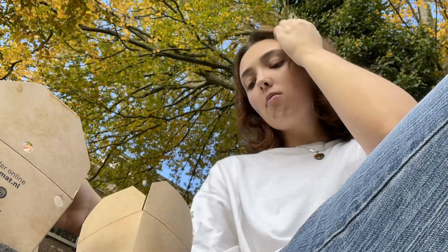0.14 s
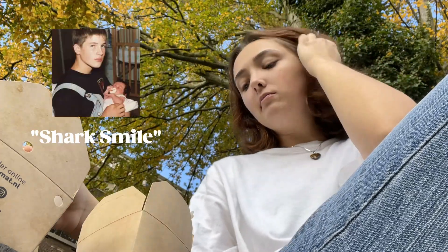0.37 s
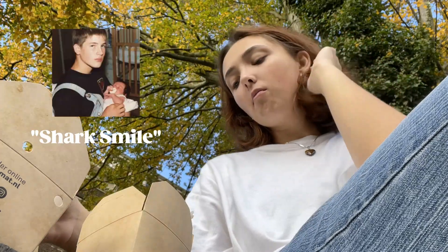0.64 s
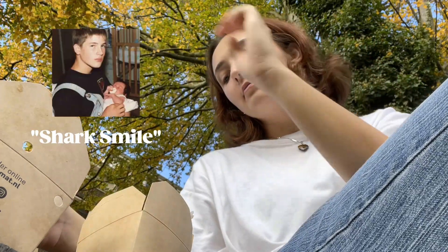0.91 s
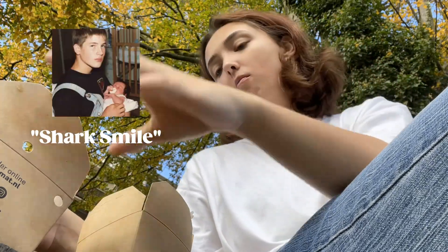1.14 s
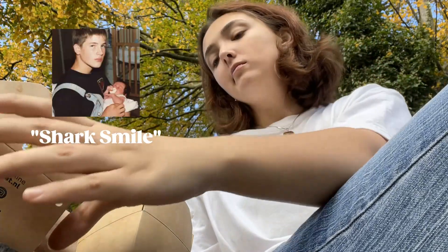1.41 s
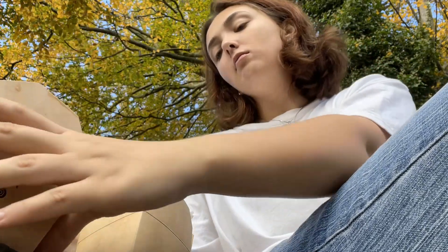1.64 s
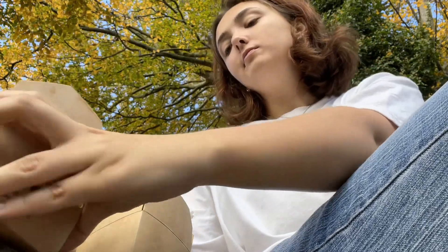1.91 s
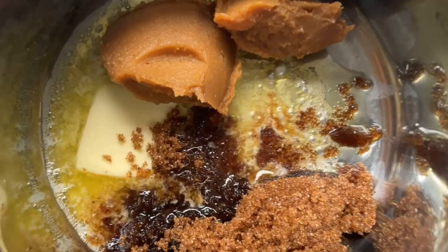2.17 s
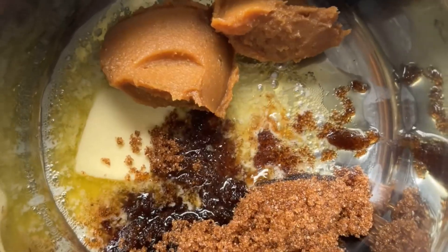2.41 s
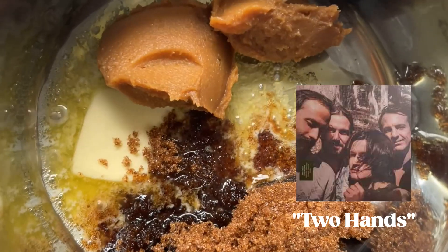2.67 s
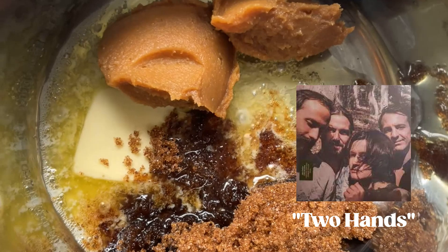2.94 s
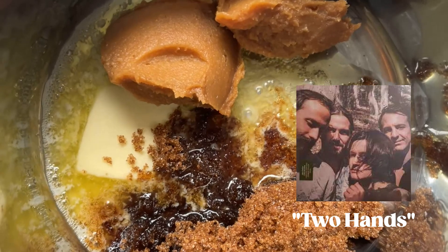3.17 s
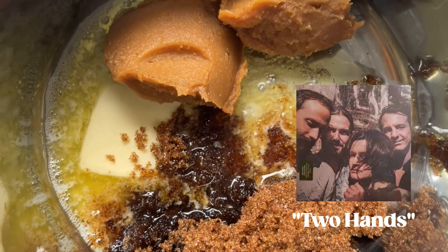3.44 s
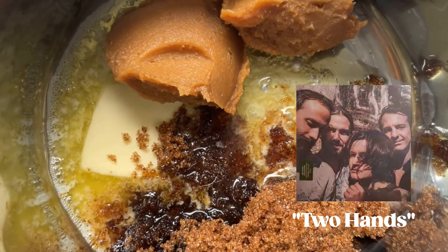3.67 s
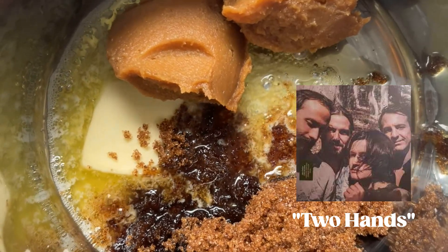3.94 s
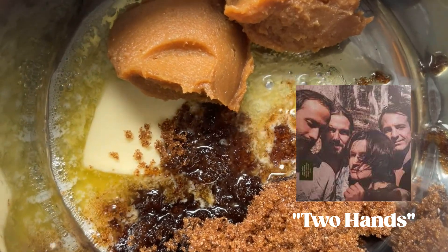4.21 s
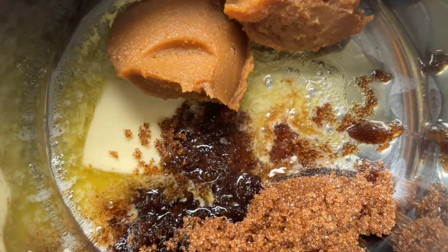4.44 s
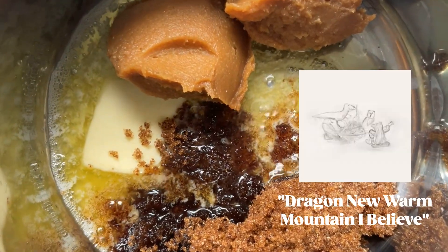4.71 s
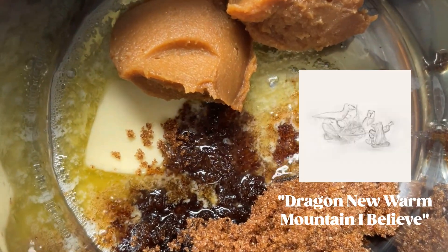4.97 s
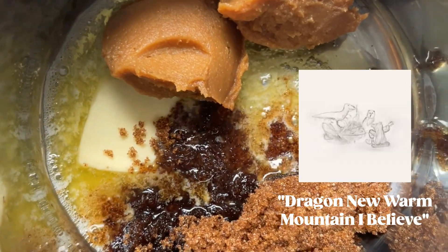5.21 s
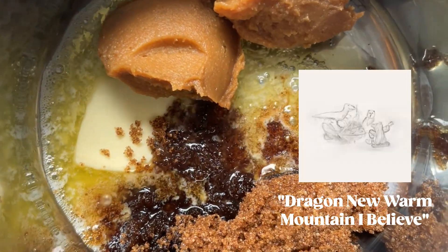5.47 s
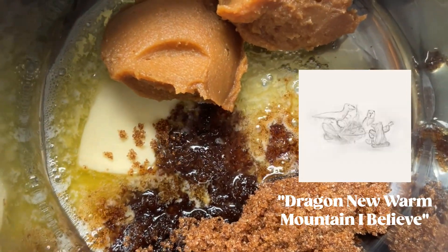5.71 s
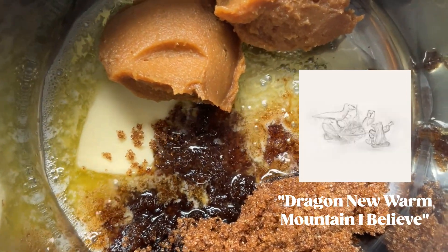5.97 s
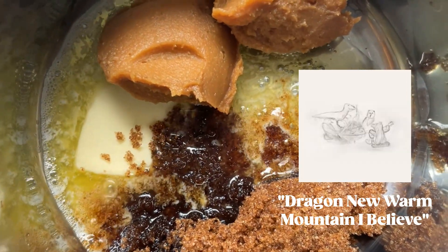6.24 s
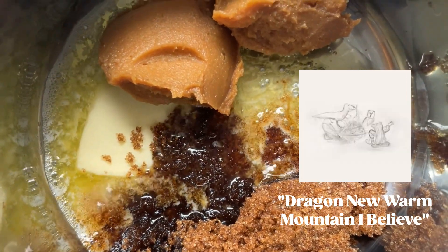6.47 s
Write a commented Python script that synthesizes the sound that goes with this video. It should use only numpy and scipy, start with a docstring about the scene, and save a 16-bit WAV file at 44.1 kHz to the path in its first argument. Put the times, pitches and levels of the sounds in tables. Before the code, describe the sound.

A quiet park: steady low rumble of distant traffic, faint engine hums, barely audible leaves and tiny high blips. Near two seconds a hand rubs a cardboard box close to the microphone, with hollow scuffs and small creaks. A sharp cut and a tiny silence, then butter and sugar sizzle in a metal pan heard closely from above, with snappy pops, sputters and a slight metallic ring, until it stops dead.

```python
"""A park under trees: distant traffic rumble, far engines, leaves and short high blips, all shaped from noise.
A hand rubs a cardboard box beside the microphone: uneven grains of noise excite the card's resonances.
After a short silence, butter and sugar sizzle in a steel pan heard from close above: steam pockets burst
through the fat as pops and short rising sputters, and the bowl of the pan rings. Each is a snap and a
spiky jet of noise through resonances; fizz, spray and gurgle fill in below. It stops dead."""
import sys
import numpy as np
from scipy import signal
from scipy.fft import rfft, irfft, next_fast_len
from scipy.io import wavfile
from scipy.ndimage import uniform_filter1d

SR = 44100
rng = np.random.default_rng(int(sys.argv[2]) if len(sys.argv) > 2 else 0)


def undo_db(level):
    """Turn decibels back into plain size, where 20 dB means ten times bigger."""
    steps = np.asarray(level, float) / 20
    return 10 ** steps


def pcm_store(signal):
    """Save signal as 16-bit PCM."""
    levels = np.round(np.clip(np.atleast_2d(signal), -1, 1) * 32767)
    wavfile.write(sys.argv[1], SR, levels.astype(np.int16).T)


N = 291485  # length in samples


def evened(x):
    """Scales to rms 1."""
    return x / np.sqrt(np.mean(x ** 2) + 1e-20)


def hiss():
    """White noise for the whole length."""
    return rng.standard_normal(N)


def curve(rows, column=1):
    """Draws one column of a table as an automation line, a value for every sample."""
    rows = np.array(rows)
    return np.interp(np.arange(N) / SR, rows[:, 0], rows[:, column])


def swells(rows, rest_db):
    """Bell-shaped rises of level over a resting level, as gain; their powers add."""
    t = np.arange(N) / SR
    bells = sum(undo_db(db) ** 2 * np.exp(-((t - s) / half) ** 2) for s, half, db in rows)
    return np.sqrt(undo_db(rest_db) ** 2 + bells)


def add(mix, s, sound):
    """Mixes a sound in at time s."""
    part = mix[round(s * SR):][:len(sound)]
    part += sound[:len(part)]


def resonate(x, hz, width_hz):
    """Resonance of gain 1: shifts hz (fixed or gliding) down to zero, smooths, and shifts back."""
    turn = np.exp(2j * np.pi * np.cumsum(hz * np.ones(len(x))) / SR)
    r = np.exp(-np.pi * width_hz / SR)
    return 2 * (turn * signal.lfilter([1 - r], [1, -r], x / turn)).real


def wash(spectrum, patchy_db, flicker_db):
    """Noise of a given spectrum with drifting patches and a flicker common to all pitches, at rms 1."""
    frames, hz = N // 256 + 5, np.fft.rfftfreq(1024, 1 / SR)
    a, b, patches = rng.standard_normal((frames, 513, 3)).T
    patches = evened(uniform_filter1d(uniform_filter1d(patches, 14, 0), 12, 1))
    flicker = evened(uniform_filter1d(rng.standard_normal(frames), 4))
    f, db = np.transpose(spectrum)
    shape_db = np.interp(np.log(hz + 1), np.log(f + 1), db)[:, None]
    field_db = shape_db + patchy_db * patches + flicker_db * flicker
    noise = signal.istft((a + 1j * b) * undo_db(field_db), nperseg=1024, noverlap=768)[1]
    return evened(noise[:N])


def crackle(x, spread_db, size=60):
    """Breaks steady noise into short grains of about size samples, at rms 1."""
    grains = uniform_filter1d(rng.exponential(1, N) ** 2, size)
    return evened(x * undo_db(spread_db * evened(grains - 2)))


# Colour of the traffic: f/Hz, relative density/dB per Hz
TRAFFIC_SPECTRUM = [(20, -33), (58, 1.5), (100, 1), (170, -3), (416, -12.5), (650, -19.5), (900, -15.5),
                    (1250, -21), (1700, -28.5), (3500, -35.5), (8200, -50), (12800, -52), (16500, -73)]
# Fader of the traffic: t/s, level/dB
TRAFFIC_LEVEL = [(0.0, -42), (0.07, -40), (2.05, -44)]


def traffic():
    """Distant traffic: many far sources blur into one nearly steady low wash."""
    return undo_db(curve(TRAFFIC_LEVEL)) * wash(TRAFFIC_SPECTRUM, patchy_db=1.25, flicker_db=-0.14)


# Colour of the rustle in the crowns: f/Hz, relative density/dB per Hz
LEAVES_SPECTRUM = [(5000, -30), (8500, -8), (11000, 5), (13500, -4), (16000, -28)]
LEAVES_DB = -83.5


def leaves():
    """Leaves brush each other: faint, restless, patchy treble."""
    return undo_db(LEAVES_DB) * wash(LEAVES_SPECTRUM, patchy_db=5.5, flicker_db=5.5)


# Far engines: f/Hz, width/Hz, fader [t/s, level/dB]
ENGINE_DRONES = [(101, 18, [(0, -64), (1.0, -52), (2.05, -47.5)]), (157, 22, [(0, -48), (.6, -54.5),
                 (1.1, -56), (2.05, -71)])]
# One more engine swelling: middle t/s, half width/s, level/dB
ENGINE_MOANS = [(.38, 0.067, -50.5)]
MOAN_HZ = 354


def engines():
    """Far engines: noise narrowed by a resonance to a wavering hum."""
    out = swells(ENGINE_MOANS, -np.inf) * evened(resonate(hiss(), MOAN_HZ, 40))
    for hz, width, levels in ENGINE_DRONES:
        out += undo_db(curve(levels)) * evened(resonate(hiss(), hz, width))
    return out


# Faint steady bands in the distance: f/Hz, level/dB
DISTANT_BANDS = [(3650, -73), (4480, -78)]


def distant_bands():
    """Narrow bands of noise that hold one level."""
    return sum(undo_db(db) * evened(resonate(hiss(), hz, 130)) for hz, db in DISTANT_BANDS)


# Faint short narrow bands of high noise, some gliding: t/s, length/s, first f/Hz, last f/Hz, level/dB
BLIPS = [(0.146, 0.11, 10600, 10500, -72), (.12, .12, 9200, 9050, -73), (.22, .06, 12900, 12800, -72),
         (0.347, .05, 9650, 9500, -80), (.43, .04, 13200, 13100, -75), (.49, .04, 14400, 14300, -73),
         (.585, .03, 10000, 10100, -76), (0.64, 0.042, 10130, 10430, -70), (.885, 0.066, 11900, 11750, -72),
         (.92, .03, 9200, 9150, -72), (1.07, .05, 8860, 8850, -73), (1.21, 0.069, 9350, 9450, -73),
         (1.368, .06, 10650, 10550, -71), (1.44, .03, 10500, 10300, -74), (1.473, 0.066, 12050, 13450, -66)]


def blips():
    """Each blip is noise through a narrow, often gliding resonance, faded in and out."""
    out = np.zeros(N)
    for s, length, first_hz, last_hz, db in BLIPS:
        glide = np.linspace(first_hz, last_hz, round(length * SR))
        band = resonate(rng.standard_normal(len(glide)), glide, 46.4)
        add(out, s, undo_db(db) * evened(band) * np.hanning(len(glide)))
    return out


# Resonances of the cardboard: f/Hz, width/Hz, relative level/dB
BOX_MODES = [(523, 230, 10.5), (1010, 100, 19), (1940, 82, -9), (4400, 1600, -24), (7400, 2000, -21)]
# The grip flexes the card: t/s, pitch factor
CARD_FLEX = [(1.74, .95), (1.855, 0.86), (1.89, 1.05), (1.99, 0.98), (2.05, 1.1)]
# Strokes of the hand: middle t/s, half width/s, level/dB
RUB_STROKES = [(1.76, 0.0092, -48.5), (1.86, 0.04, -46), (1.965, 0.027, -43), (2.02, 0.026, -51.5)]


def rubbed_box():
    """Skin slips unevenly on the card, and the slips set its bending resonances going."""
    slips = hiss() * undo_db(1.1 * rng.exponential(1, N))
    slips = crackle(slips, spread_db=1.8, size=150)
    flex = curve(CARD_FLEX)
    box = sum(undo_db(db) * resonate(slips, hz * flex, width) for hz, width, db in BOX_MODES)
    box = resonate(box, 2100, 14000)  # softens the treble
    return swells(RUB_STROKES, -np.inf) * evened(box)


# Creaks of the box: t/s, level/dB, f/Hz
BOX_CREAKS = [(1.8088, -59, 6480), (1.819, -53.5, 3470), (1.8304, -56, 3490), (1.845, -57.5, 6810),
              (1.861, -58, 4450), (1.961, -53.5, 4900)]


def creaks():
    """The card snaps: a dying tick of noise through a broad resonance."""
    out = np.zeros(N)
    for s, db, hz in BOX_CREAKS:
        snap = rng.standard_normal(400) * np.exp(-np.arange(400) / SR / 0.009)
        add(out, s, undo_db(db) * evened(resonate(resonate(snap, hz, 2.0 * hz), hz, 8000)))
    return out


def park():
    """The park bed, with the box close in front."""
    return traffic() + leaves() + engines() + distant_bands() + blips() + rubbed_box() + creaks()


# Colour of the low rumble indoors: f/Hz, relative density/dB per Hz
ROOM_SPECTRUM = [(25, -35), (50, -1.5), (85, 10), (130, -11), (200, -29), (500, -52)]
# The rumble swelling: middle t/s, half width/s, level/dB
ROOM_BUMPS = [(2.13, .05, -75), (2.3, .09, -71), (2.52, .06, -67.5), (2.9, 0.043, -71), (3.6, 0.11, -78),
              (4.05, 0.042, -64), (4.3, .06, -79), (4.85, 0.19, -77.5), (5.4, 0.22, -72.5),
              (5.77, 0.044, -66.5), (6.45, 0.083, -66.5)]
ROOM_DB = -77  # at rest


def room():
    """Low rumble indoors: a bass-heavy wash that swells now and then."""
    return swells(ROOM_BUMPS, ROOM_DB) * wash(ROOM_SPECTRUM, patchy_db=1.1, flicker_db=-2.2)


# Colour of thick melt stirring: f/Hz, relative density/dB per Hz
GURGLE_SPECTRUM = [(100, -43), (180, 0.5), (550, -3), (800, -26)]
GURGLE_DB = -75  # at rest
STIR_DB, STIR_S = -24.5, 0.034  # against the ring of a 5 ms burst; half width of a heave


def gurgle():
    """Every burst that rings the bowl sets the thick melt heaving for a moment, longer bursts more."""
    heaves = [(s, STIR_S, bowl_db + STIR_DB + 10 * np.log10(ms / 5)) for s, _, _, ms, bowl_db in POPS]
    melt = wash(GURGLE_SPECTRUM, patchy_db=1.5, flicker_db=2.5)
    return swells(heaves, GURGLE_DB) * crackle(melt, spread_db=3.0)


# Colour of the simmer: f/Hz, relative density/dB per Hz
SIMMER_SPECTRUM = [(330, -51.5), (560, -3.5), (832, 5), (1570, -3.5), (6670, -3.5), (9600, -12.5),
                   (11500, -20), (15200, -22), (16500, -24)]
# Heat of the fat, to which each layer adds an offset: t/s, fizzing level/dB, bubbling level/dB
HEAT_CURVE = [(2.1, -51.5, -58.5), (2.25, -53.5, -53), (2.41, -57, -60), (2.52, -51.5, -62),
              (2.9, -52, -59), (3.2, -58, -57.5), (3.5, -53, -57), (3.9, -56, -55), (4.1, -55, -59),
              (4.4, -55, -55.5), (4.65, -54, -47.5), (4.9, -55, -51), (5.2, -56, -52.5), (5.5, -52, -53),
              (5.95, -52.5, -56), (6.2, -53, -50), (6.38, -47, -52.5), (6.53, -48.5, -58)]


def simmer():
    """Countless tiny bubbles merge into a grainy wash that follows the fizzing."""
    grains = crackle(wash(SIMMER_SPECTRUM, patchy_db=2.7, flicker_db=1.6), spread_db=0.5)
    return undo_db(curve(HEAT_CURVE) - 4.0) * grains


BOWL_HZ, BOWL_WIDTH_HZ = 833.4, 174  # main ring of the bowl, before small detunings
SEETHE_DB = -8.5  # against the bubbling level


def seethe():
    """The bubbling keeps the bowl ringing steadily: crackling noise through its resonance."""
    ring = resonate(resonate(hiss(), 1.012 * BOWL_HZ, BOWL_WIDTH_HZ), 1.105 * BOWL_HZ, 400)
    return undo_db(curve(HEAT_CURVE, column=2) + SEETHE_DB) * crackle(ring, spread_db=3.5, size=120)


# Finest mist swelling: middle t/s, half width/s, level/dB
SPRAY_SWELLS = [(2.14, 0.14, -50.5), (2.7, .15, -57), (3.05, 0.074, -65), (4.3, 0.071, -53),
                (4.85, .3, -69), (5.85, 0.1, -63), (6.15, .02, -60), (6.32, 0.056, -60.5), (6.48, .04, -63)]
SPRAY_DB = -66  # at rest


def spray():
    """The finest mist: top treble broken into very short grains and again into longer ones."""
    air = resonate(resonate(hiss(), 14000, 5000), 15000, 7000)
    air = crackle(crackle(air, spread_db=3.0, size=25), spread_db=2.5, size=900)
    return swells(SPRAY_SWELLS, SPRAY_DB) * air


MIST_DB, MIST_S = -18, 0.033  # against the burst; time constant of the fade


def mist():
    """Droplets thrown up by each large burst hiss on as they fall back."""
    thrown = np.zeros(N)
    for s, db, _, ms, _ in POPS:
        add(thrown, s, [undo_db(db + MIST_DB) ** 2 * ms / (1 + ms)])
    power = signal.lfilter([1], [1, -np.exp(-2 / (MIST_S * SR))], thrown)
    drops = resonate(resonate(hiss(), 6200, 9500), 8500, 9000)
    return np.sqrt(power) * crackle(drops, spread_db=5.5, size=40)


def chances(count, size):
    """Noise and spike sizes for each burst."""
    return np.stack([rng.standard_normal((count, size)), rng.exponential(1, (count, size))], 1)


TAIL_MS = 1.5  # a vent closes softly
SWELL_PER_MS = 0.006  # long vents build up over a share of their length


def burst(hz, octaves, ms, chance):
    """A vent opens with a snap, then sputters; its pitch climbs as the pocket empties. The bowl rings along."""
    size = np.clip(round(ms * SR / 1000), 8, chance.shape[1] - 400)
    t = np.arange(size + 400) / size  # in lengths of the vent
    noise, spikes = chance[:, :len(t)]
    blowing = np.exp(-(1.1 + 2.0 / ms) * t - np.maximum(t - 1, 0) * ms / TAIL_MS)
    blowing *= min(ms / 7.3, 1)  # short vents are mostly snap
    blowing *= 1 - np.exp(-t / (SWELL_PER_MS * ms))
    sputter = np.minimum(np.repeat(spikes, repeats=24)[:len(t)], 3)  # steam leaves in clumps
    jet = noise * undo_db(2.2 * spikes + 4.7 * sputter) * blowing
    thuds = noise * undo_db(6.0 * spikes) * blowing
    jet[0] += 3.9 * np.sign(noise[0])
    thuds[0] += 45 * np.sign(noise[0])  # the bowl answers mostly to the opening and the hardest spits
    climb = np.minimum(hz * 2 ** (0.011 * ms * (np.minimum(t, 1) - .5)), SR / 2.5)
    width_hz = np.clip(0.96 * octaves * hz, 300, 9000)
    vent = jet
    for factor in (1, 1.17, 1.93, 2.9):
        vent = resonate(vent, climb, factor * width_hz)
    detuned_hz = BOWL_HZ * 2 ** (0.09 * abs(noise[1]))
    ring = resonate(resonate(thuds, detuned_hz, BOWL_WIDTH_HZ), 1010, 970)
    slap = resonate(resonate(thuds, 2300, 2500), 2300, 3500)  # comes before the ring
    bowl = evened(ring) + 0.21 * evened(slap)
    return np.array([evened(vent), evened(bowl)]) * np.sqrt(size / len(t))


FIZZ_PER_S, FIZZ_KINDS = 1100, 300


def fizz():
    """A crowd of tiny pockets of many kinds, mostly short ticks, whose strength follows the heat."""
    kinds = []
    for (pitch, broad, long), chance in zip(rng.random((FIZZ_KINDS, 3)), chances(FIZZ_KINDS, size=800)):
        hz, octaves = 2200 * 2 ** (2.6 * pitch ** 1.6), 0.22 + .45 * broad ** 3
        kinds.append(burst(hz, octaves, 0.21 + 2.37 * long ** 3, chance))
    out, fizz_db, bowl_db = np.zeros(N), curve(HEAT_CURVE), curve(HEAT_CURVE, column=2)
    start, end = KITCHEN_SPAN
    for when, kind, big, low in rng.random((round(FIZZ_PER_S * (end - start)), 4)):
        s = start + when * (end - start)
        vent_db = fizz_db[round(s * SR)] - 8.0 + 17 * big ** 4
        ring_db = bowl_db[round(s * SR)] - 8.5 + 15 * low ** 7
        add(out, s, undo_db(np.array([vent_db, ring_db])) @ kinds[int(kind * FIZZ_KINDS)])
    return out


SPITS_PER_S = 40


def spits():
    """Middle-sized pockets at random moments, louder when the fat fizzes harder."""
    out, fizz_db, bowl_db = np.zeros(N), curve(HEAT_CURVE), curve(HEAT_CURVE, column=2)
    start, end = KITCHEN_SPAN
    count = round(SPITS_PER_S * (end - start))
    draws = zip(rng.random((count, 6)), chances(count, size=1200))
    for (when, pitch, broad, long, big, low), chance in draws:
        s = start + when * (end - start)
        vent_db = fizz_db[round(s * SR)] - 2 + 8 * big ** 2
        ring_db = bowl_db[round(s * SR)] - 4.5 + 9 * low ** 2
        hz, octaves = 3000 * 2 ** (2.2 * pitch ** 1.6), 0.22 + 0.5 * broad ** 3
        sound = burst(hz, octaves, 0.61 + 3.5 * long ** 2, chance)
        add(out, s, undo_db(np.array([vent_db, ring_db])) @ sound)
    return out


NARROW_OCTAVES, WIDE_OCTAVES = 0.23, 1.61
WIDE_AT_DB = -4  # a vent is broad when the ring nears its level (ring minus vent)
SNAP_OCTAVES, SNAP_AT_DB = 0.75, -26  # the hardest pops tear a wider opening
SETTLE_MS = 41  # a vent that blows this long has narrowed to half its breadth


def breadth(db, bowl_db, ms):
    """Nominal width of a vent's hiss in octaves: wide for deep or hard bursts, narrower for long ones."""
    deep = 1 / (1 + undo_db(WIDE_AT_DB - (bowl_db - db)))
    hard = 1 / (1 + undo_db(SNAP_AT_DB - db))
    octaves = NARROW_OCTAVES + (WIDE_OCTAVES - NARROW_OCTAVES) * deep + SNAP_OCTAVES * hard
    return octaves / (1 + ms / SETTLE_MS)


# The larger steam pockets, before the pan colours them:
# t/s, vent level/dB, centre f/Hz, length/ms, bowl ring level/dB
POPS = [(2.0984, -46, 4600, 11.7, -49), (2.1146, -38, 10860, 4.7, -62), (2.1218, -37, 13700, 6, -71),
        (2.1245, -28, 14000, 0.66, -66), (2.133, -34, 8300, 2.1, -41), (2.185, -53, 8500, 1.8, -56),
        (2.195, -52, 7500, 2, -58), (2.2095, -50, 13000, 2, -62), (2.221, -46.5, 6840, 12, -50.5),
        (2.242, -46, 12000, 1.5, -65), (2.2512, -43.5, 3800, 3.9, -53), (2.269, -46, 4820, 5.1, -48.5),
        (2.2918, -47.5, 6000, 3.4, -54), (2.3052, -42.5, 9050, 3, -66), (2.335, -47, 3730, 23.6, -51),
        (2.3717, -34, 8060, 0.53, -44), (2.385, -47.5, 2800, 1, -49), (2.431, -47, 9000, 2, -61.5),
        (2.4596, -39, 4400, 1.9, -44), (2.484, -44, 3760, 13.6, -42.5), (2.501, -42, 7100, 5, -50),
        (2.5192, -38.5, 3970, 17, -56), (2.54, -41.5, 7400, 8.1, -50), (2.548, -45.5, 11600, 19, -64),
        (2.575, -41, 7000, 17, -54.5), (2.586, -34, 7160, 0.86, -49), (2.598, -40, 9700, 14, -54),
        (2.6259, -40, 5650, 3.2, -52), (2.6406, -43, 7500, 16, -49.5), (2.656, -39, 12900, 2.3, -63),
        (2.6682, -36.5, 6400, 3.7, -50.5), (2.686, -47, 7500, 4.2, -56), (2.7087, -43.5, 4100, 8.8, -57),
        (2.7197, -41, 8800, 6, -51), (2.752, -44.5, 8000, 15, -57), (2.769, -40, 9600, 3.3, -52),
        (2.7802, -47.5, 3400, 3, -60), (2.792, -52.5, 3800, 10, -57.5), (2.8182, -45, 7300, 5.2, -49),
        (2.826, -45, 6500, 1.5, -60), (2.833, -47, 6500, 1.5, -58), (2.838, -49.5, 3770, 15, -54),
        (2.8532, -38, 3930, 8.4, -58), (2.8563, -40, 7600, 0.92, -64), (2.861, -41, 7600, 1, -62),
        (2.8665, -42.5, 7800, 1, -63), (2.8682, -42, 3910, 10, -66), (2.872, -41, 6950, 12.6, -53),
        (2.8923, -41, 7800, 4.2, -42), (2.9084, -43.5, 8800, 3.9, -60), (2.9165, -47.5, 6420, 2.4, -49),
        (2.929, -50, 6500, 1.3, -59), (2.9407, -44, 7020, 1.9, -45), (2.973, -53, 7500, 1.8, -61),
        (2.9866, -41.5, 5470, 1.8, -49), (2.9931, -40, 14610, .7, -64), (3.0, -45, 7500, 1.5, -58),
        (3.035, -47.5, 6800, 6, -67), (3.058, -48, 8000, 3, -60), (3.0637, -39, 6360, 1.7, -45.5),
        (3.068, -47, 8500, 1.5, -49), (3.09, -45, 7000, 1.7, -54), (3.0973, -38.5, 6650, 3.8, -56),
        (3.1166, -30, 6200, 1.9, -53), (3.156, -47, 6760, 2.7, -68), (3.187, -48, 7900, 3, -60),
        (3.2226, -34.5, 6800, 1, -57), (3.237, -51, 8000, 2.6, -58), (3.251, -40, 5850, 2.3, -57),
        (3.2635, -49, 7000, 23, -56), (3.298, -49.5, 7350, 6, -68), (3.347, -44.5, 3080, 2.2, -57),
        (3.3777, -30.5, 9500, 0.59, -66), (3.3839, -28.5, 5630, 0.49, -59), (3.4142, -41.5, 4350, 3.9, -62),
        (3.422, -49, 13000, 1.5, -56), (3.428, -48, 8000, 3.9, -58), (3.435, -45, 13500, 2, -69),
        (3.445, -48, 7500, 5, -60), (3.488, -44.5, 7000, 2.3, -56), (3.509, -50, 4800, 15, -48.5),
        (3.528, -53, 3100, 2.7, -38), (3.549, -67, 3000, 6.2, -46), (3.565, -38.5, 7440, 0.74, -46),
        (3.598, -50, 8600, 5.8, -51.5), (3.654, -58, 3050, 8.2, -50.5), (3.676, -45, 6640, 1.3, -48),
        (3.688, -62, 3000, 4, -49), (3.6994, -34, 12700, 1, -68), (3.741, -49.5, 5960, 4, -62),
        (3.761, -54, 3000, 1.7, -46), (3.78, -51, 3150, 3.4, -43.5), (3.798, -38, 6800, 0.99, -57),
        (3.851, -56, 3200, 6.4, -48.5), (3.876, -58, 2600, 4.4, -51), (3.958, -48, 6640, 4.5, -50.5),
        (3.971, -46, 6800, 2, -72), (4.05, -47, 3000, 3, -47), (4.067, -30, 6140, 2.4, -45),
        (4.0911, -38, 7800, 1.2, -62), (4.1145, -61, 4030, 5, -44.5), (4.1474, -47, 5750, 2.6, -55),
        (4.1915, -43.5, 3280, 2.6, -54), (4.197, -36, 8230, 2.2, -41), (4.206, -32, 11700, 2.3, -52),
        (4.262, -45, 11000, 2.2, -56.5), (4.2688, -52.5, 3600, 14.5, -46),
        (4.2978, -45.5, 9440, 2.8, -47.5), (4.309, -54.5, 3000, 2.5, -41), (4.329, -45, 12000, 2.2, -62),
        (4.349, -69, 3030, 5.9, -39.5), (4.515, -50, 6640, 1.7, -54), (4.532, -53, 2800, 1.5, -47),
        (4.5524, -24, 8300, 2.34, -39.5), (4.603, -49, 4830, 5.7, -52), (4.6584, -52.5, 3960, 15, -45),
        (4.679, -50, 3930, 2.7, -48), (4.696, -44.5, 6700, 7.7, -56), (4.746, -35.5, 4660, 3.8, -39.5),
        (4.7902, -44.5, 5000, 5.1, -50), (4.8065, -43, 5400, 4.1, -42), (4.8494, -38.5, 5460, 2.3, -37),
        (4.8571, -53, 3740, 2.4, -42.5), (4.8706, -67, 3430, 6.6, -43.5), (4.9692, -51.5, 5070, 11, -41.5),
        (5.08, -44, 8700, 5.5, -68), (5.1045, -39.5, 10500, 2.3, -52), (5.324, -53, 3000, 2.1, -42.5),
        (5.3436, -44, 2850, 3.1, -52), (5.39, -65, 3900, 15, -46.5), (5.4369, -49, 5700, 3.9, -40.5),
        (5.443, -44, 3430, 7.6, -51.5), (5.455, -49.5, 3020, 11.5, -43), (5.5113, -32.5, 5130, 3, -45.5),
        (5.5168, -26.5, 5130, 2.1, -46), (5.5274, -48, 4160, 6.2, -46), (5.5378, -44, 4830, 2.2, -66),
        (5.5532, -46.5, 3980, 5.5, -66), (5.5892, -36, 5830, 2.9, -63), (5.5955, -36.5, 6400, 4.4, -49),
        (5.6761, -42, 4680, 2.2, -46), (5.706, -43, 6130, 2.1, -49), (5.715, -33.5, 8200, 2.5, -71),
        (5.7646, -45, 6040, 5.5, -60), (5.7825, -40, 7440, 1.6, -60), (5.7916, -21, 7100, 0.91, -36.5),
        (5.84, -40, 4000, 0.77, -52), (5.866, -43.5, 8650, 2.6, -71), (5.877, -43, 8800, 3.3, -71),
        (5.9731, -39, 6400, 3.9, -39.5), (6.078, -38.5, 5660, 5.8, -51.5), (6.106, -48, 7000, 2.2, -55),
        (6.126, -45, 3500, 3, -59), (6.138, -45.5, 5070, 13, -42), (6.1526, -40.5, 4640, 6.3, -43.5),
        (6.188, -41, 4050, 2.6, -37.5), (6.208, -49.5, 7500, 10, -56), (6.218, -44, 5570, 2.7, -46),
        (6.2547, -42.5, 3570, 6.9, -44), (6.268, -32.5, 5600, 1.6, -67), (6.2835, -38, 9900, 9.6, -48),
        (6.3076, -43, 2950, 2.6, -39), (6.318, -50, 5660, 22, -52), (6.3492, -40.5, 4730, 16, -48),
        (6.3773, -48.5, 2800, 21, -45.5), (6.397, -44, 3100, 13, -54), (6.4052, -41.5, 3500, 18, -45),
        (6.441, -38.5, 5870, 3.5, -41), (6.461, -45, 6660, 5, -54), (6.473, -44.5, 6730, 8.2, -52),
        (6.4846, -58, 3510, 6, -42), (6.5012, -41.5, 3800, 9.1, -44), (6.5116, -43.5, 3720, 13, -56)]


def pops():
    """The larger pockets burst one by one, each with its own vent and ring of the bowl."""
    out = np.zeros(N)
    for (s, db, hz, ms, bowl_db), chance in zip(POPS, chances(len(POPS), size=2000)):
        sound = burst(hz, breadth(db, bowl_db, ms), ms, chance)
        add(out, s, undo_db(np.array([db, bowl_db])) @ sound)
    return out


# Inverted echoes from the sides of the pan: delay/ms, level/dB
PAN_ECHOES = [(.45, -22.5), (1.1, -16), (1.9, -23), (3.1, -22.5), (4.6, -26)]
# Resonances of the pan, added to the sound: f/Hz, width/Hz, level/dB
PAN_MODES = [(1900, 850, 1.5), (3206, 190, -3), (3930, 370, -5.5), (5350, 55, -2.5), (6470, 570, -2),
             (8500, 1700, -13), (9440, 60, -18)]


def sizzle():
    """The pops over spits, fizz, simmer and spray, echoed and coloured by the pan."""
    out = simmer() + seethe() + spray() + mist() + fizz() + spits() + pops()
    small_pockets = signal.butter(6, 670, "high", fs=SR, output="sos")  # they radiate no bass
    out = signal.sosfilt(small_pockets, out)
    walls = np.zeros(400)
    walls[0] = 1
    for ms, db in PAN_ECHOES:
        walls[round(ms * SR / 1000)] = -undo_db(db)
    out = signal.oaconvolve(out, walls)[:N]
    ringing = sum(undo_db(db) * resonate(out, hz, width) for hz, width, db in PAN_MODES)
    return undo_db(-3.0) * (out + ringing)


# Response of the microphone: f/Hz, gain/dB
MIC_RESPONSE = [(0, -60), (30, -25.5), (55, -0.5), (10000, -1.5), (12500, -5), (15500, 2), (15900, -0.5),
                (16300, -48.5), (22050, -78)]


def microphone(x):
    """Rolls off the deep bass, dips and lifts in the top treble, and cuts off above it."""
    hz, db = np.transpose(MIC_RESPONSE)
    size = next_fast_len(N)
    gain = undo_db(np.interp(np.fft.rfftfreq(size, 1 / SR), hz, db))
    return irfft(rfft(x, size) * gain, size)[:N]


# When the park is heard: start t/s, end t/s
PARK_SPAN = (0, 2.056)
# When the kitchen is heard: start t/s, end t/s
KITCHEN_SPAN = (2.0978, 6.534)


def during(span):
    """A gate open over the span, with 0.34 ms edges."""
    t = np.arange(N) / SR
    return np.clip(np.minimum(t - span[0], span[1] - t) / 0.00034, 0, 1)


def scene():
    """The two places, one after the other, each cut off sharply."""
    outdoors = microphone(park())
    indoors = microphone(room() + gurgle() + sizzle())
    return (during(PARK_SPAN) * outdoors + during(KITCHEN_SPAN) * indoors)[None]


def band_limit(x):
    """A steep low-pass at the top of the band."""
    return signal.sosfilt(signal.butter(12, 16820, fs=SR, output="sos"), x)


def record(dry):
    """Turns the finished mix into the final sound."""
    return band_limit(dry)


dry = scene()
out = record(dry)
pcm_store(out)
```